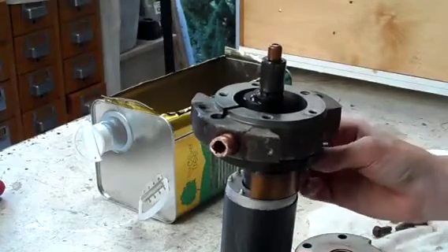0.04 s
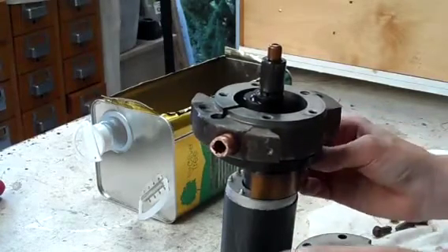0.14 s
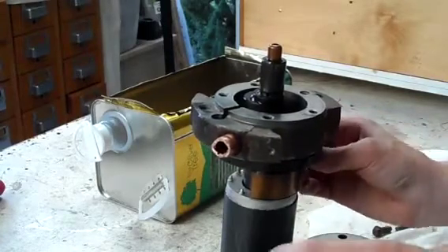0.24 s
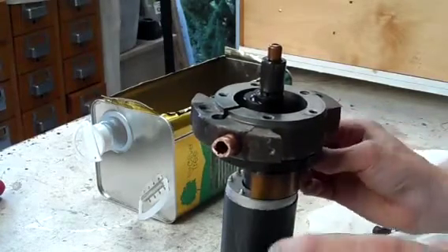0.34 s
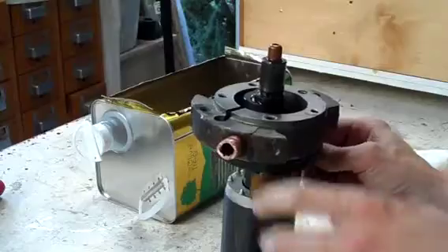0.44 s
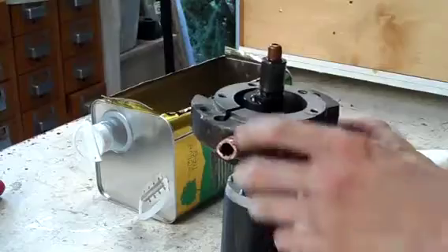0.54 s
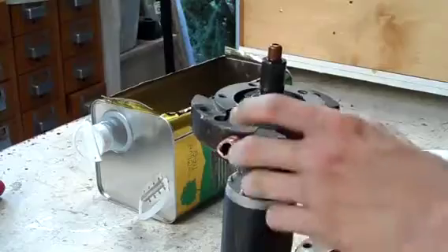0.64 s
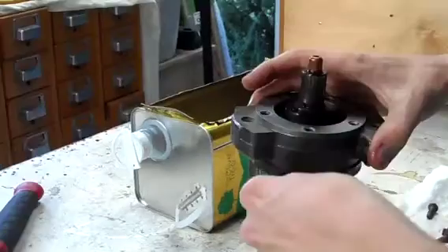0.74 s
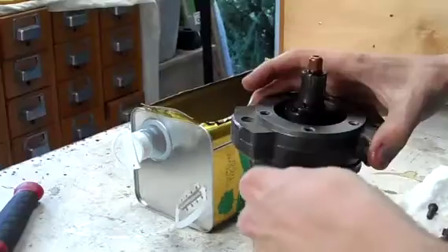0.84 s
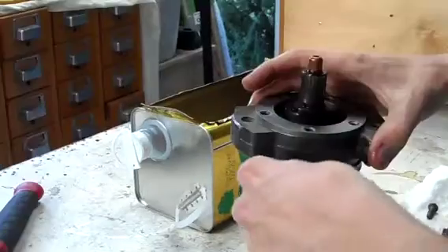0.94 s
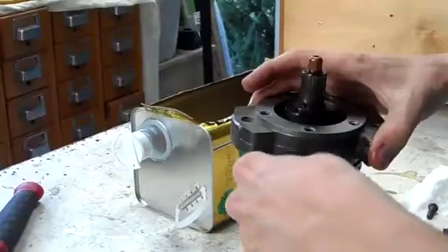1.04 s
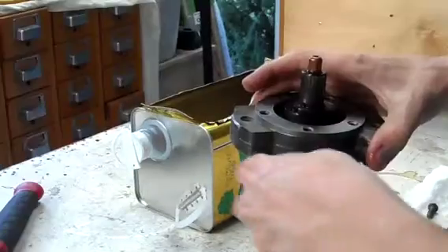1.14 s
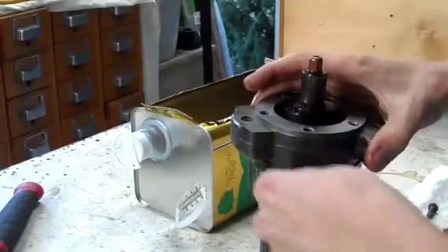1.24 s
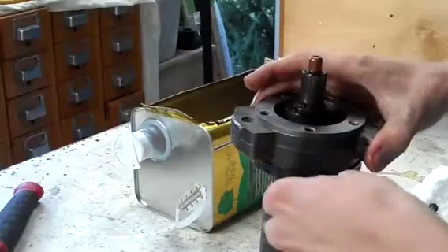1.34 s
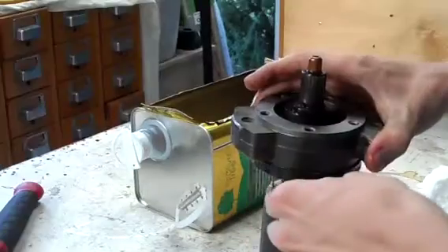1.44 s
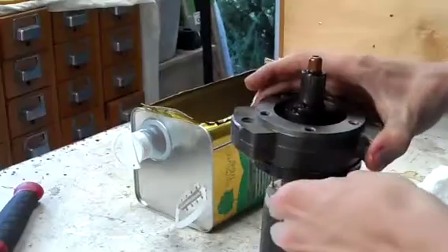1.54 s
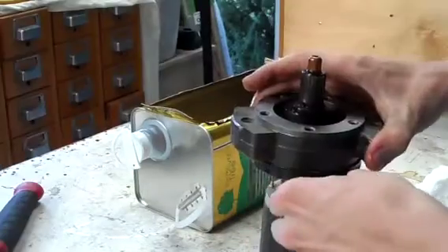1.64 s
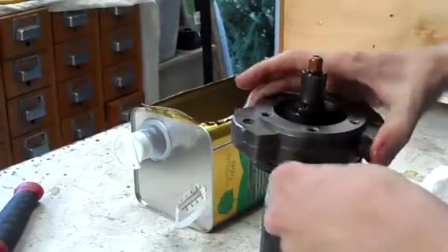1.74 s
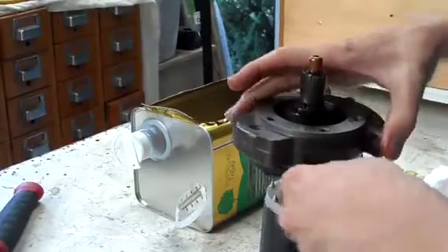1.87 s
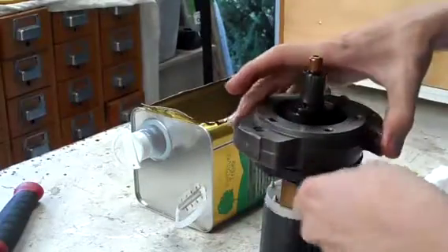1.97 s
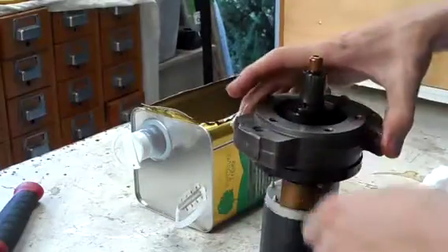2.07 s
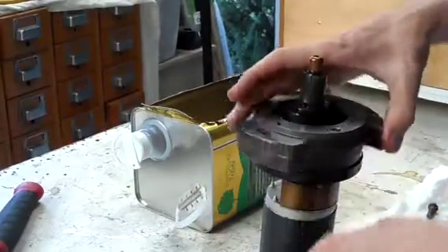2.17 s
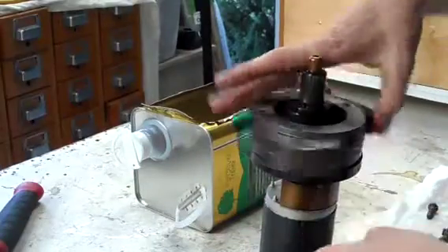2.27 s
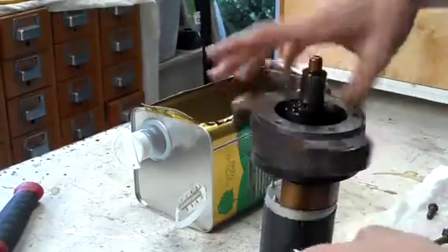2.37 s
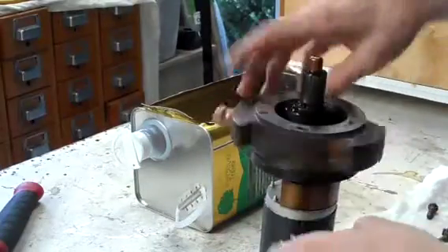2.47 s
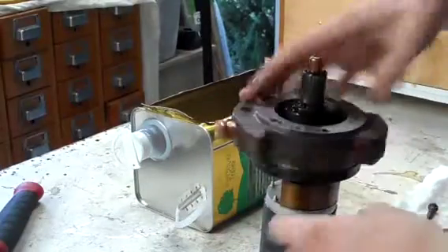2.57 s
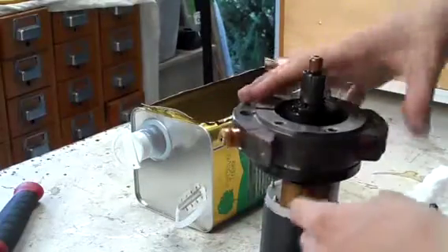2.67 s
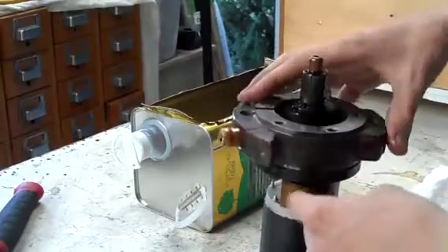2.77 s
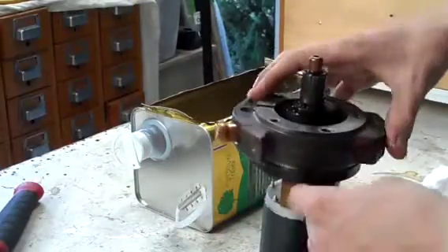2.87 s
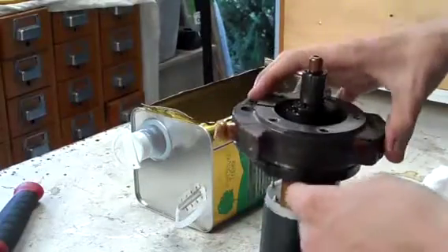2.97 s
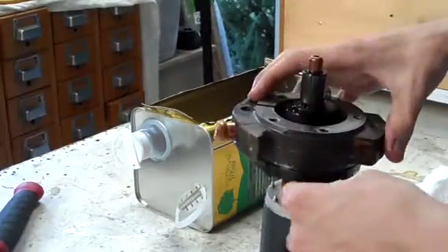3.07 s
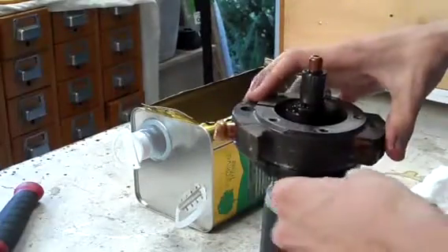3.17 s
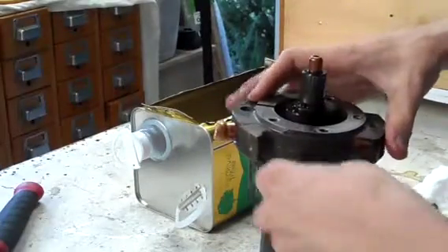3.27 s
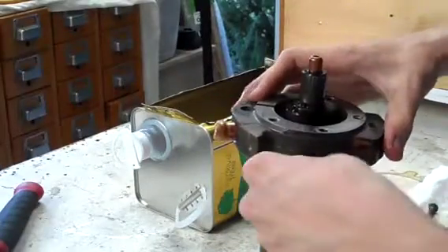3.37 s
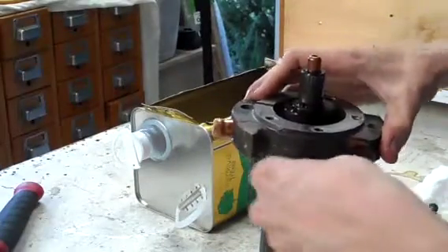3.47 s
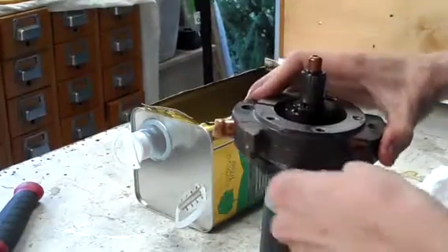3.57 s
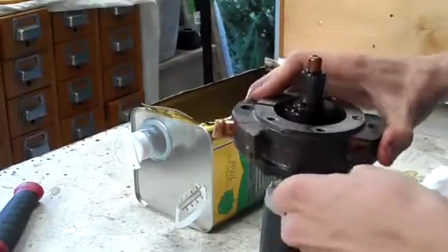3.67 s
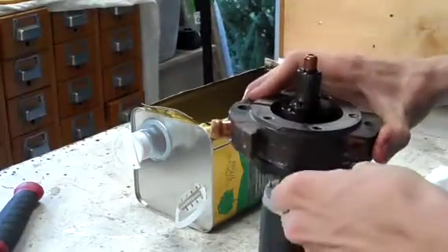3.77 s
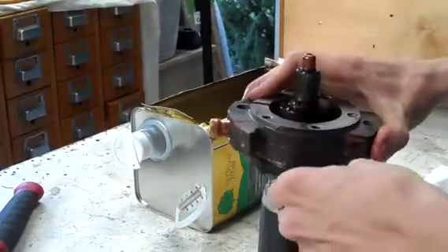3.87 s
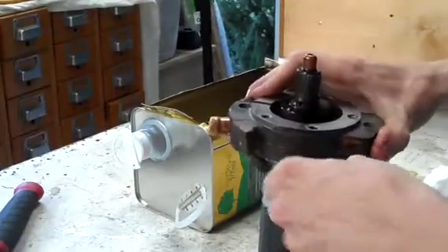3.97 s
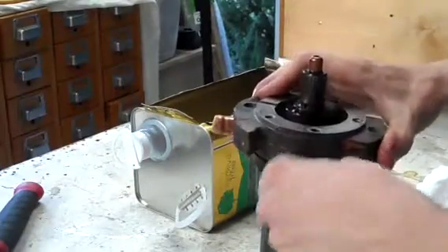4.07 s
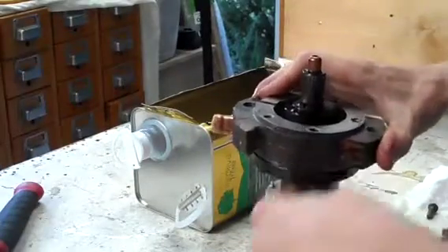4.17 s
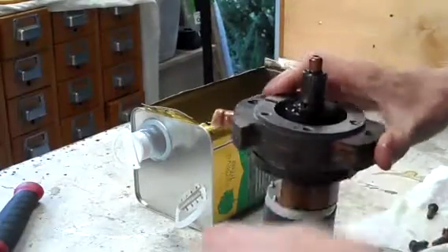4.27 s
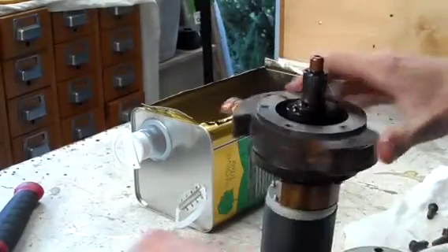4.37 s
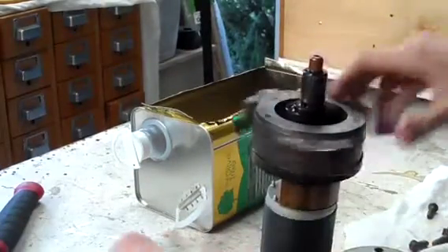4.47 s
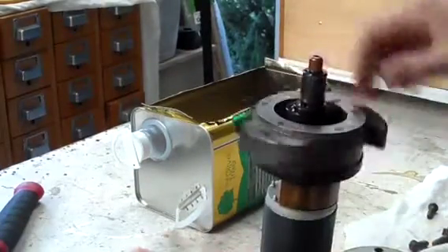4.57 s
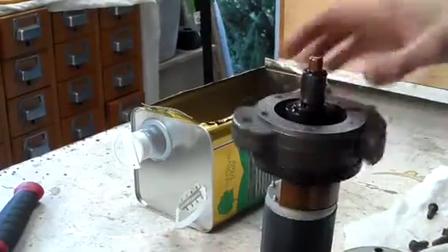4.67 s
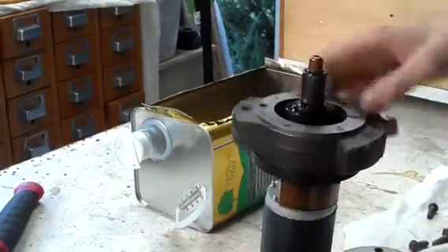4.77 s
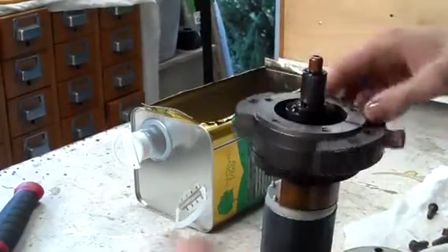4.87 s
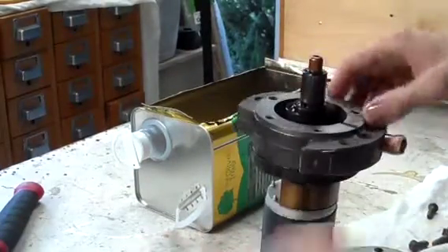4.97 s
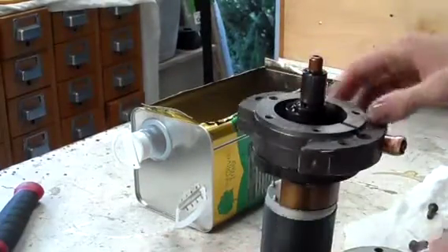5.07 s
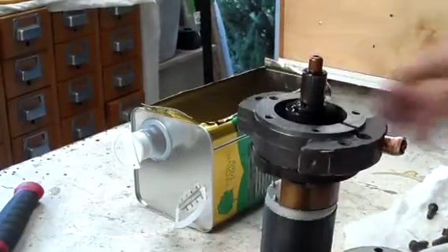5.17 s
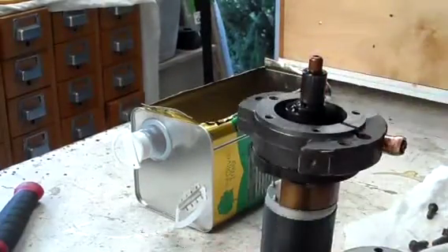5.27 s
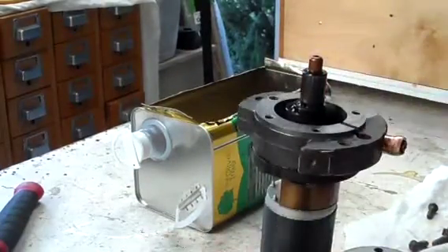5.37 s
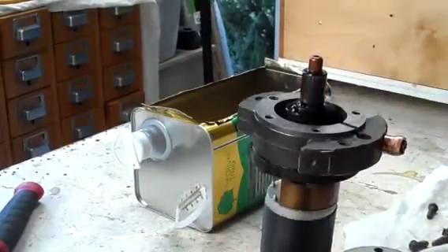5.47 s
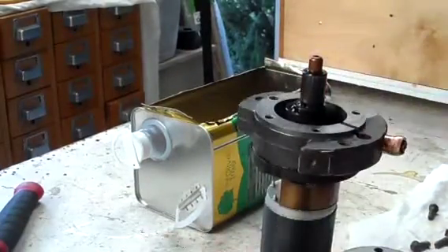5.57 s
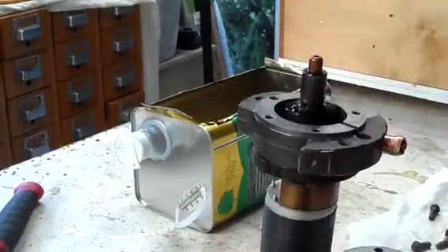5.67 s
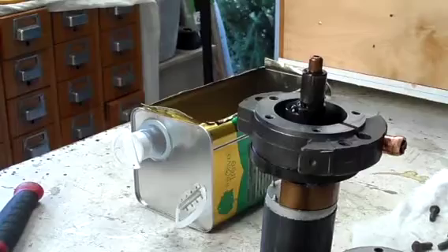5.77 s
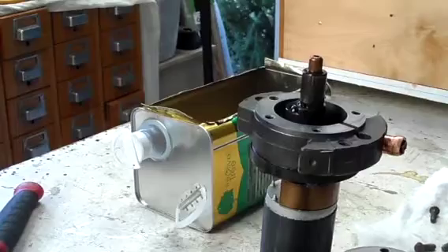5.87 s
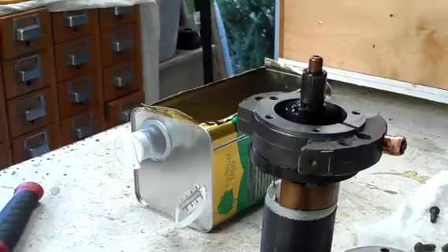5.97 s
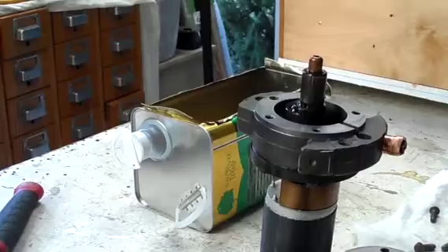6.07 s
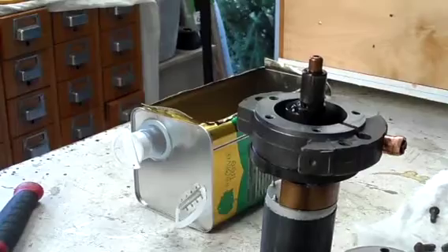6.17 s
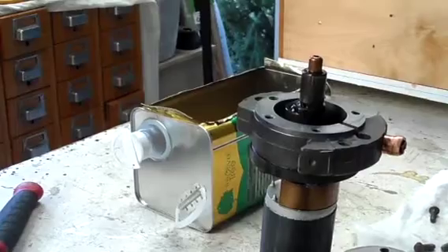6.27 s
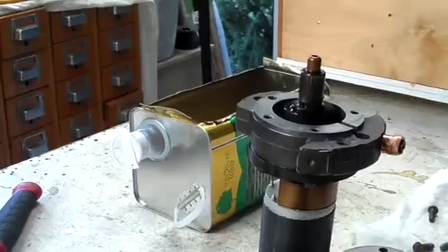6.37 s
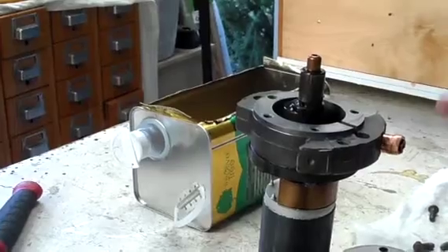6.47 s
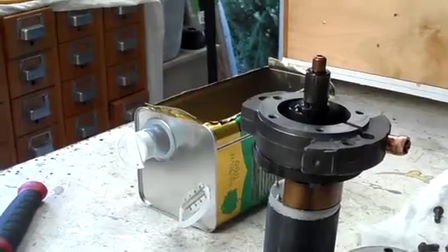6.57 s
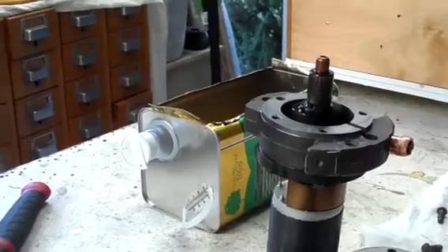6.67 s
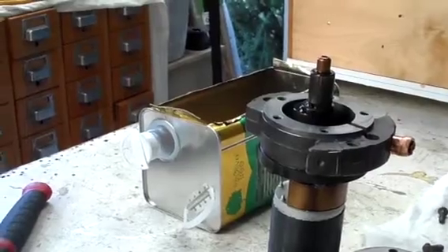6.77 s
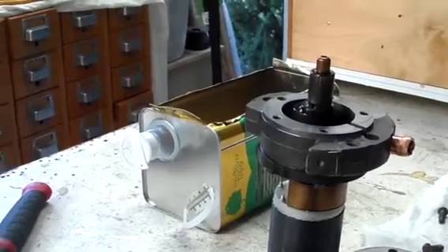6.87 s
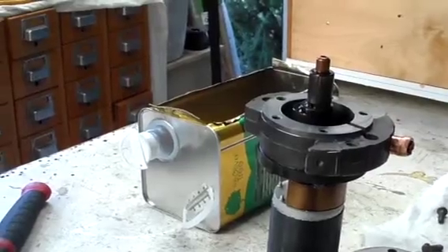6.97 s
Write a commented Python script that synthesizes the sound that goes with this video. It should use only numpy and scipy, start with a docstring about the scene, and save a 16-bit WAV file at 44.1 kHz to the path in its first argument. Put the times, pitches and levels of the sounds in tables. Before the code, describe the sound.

Close microphone in a small quiet workshop with low room rumble, faint wavering hums and a distant bird chirp at first. Hands turn a cast metal housing on its shaft: bright small clinks, soft bench thuds, skin rubs and one sharper fitting tap. Near the end the housing slips and clanks loudly, scrapes, then clanks again with a rapid chatter and thin high squeal. Quiet thuds, brushes and small plastic ticks follow.

```python
"""Low room rumble, wavering drones and a faint bird open a small, quiet workshop, heard up close.
At the bench a cast compressor housing is turned by hand on its shaft: small parts clink, fingers rub,
the bench thuds; then the housing slips, clanks down twice and chatters onto its seat with a squeal.
Blows ring fixed modes over dense coloured noise; sliding is random impacts and wavering tones;
rubs and room are filtered noise; drones and bird are unsteady sines."""
import sys
import numpy as np
from scipy import signal
from scipy.fft import rfft, irfft, next_fast_len
from scipy.io import wavfile
from scipy.ndimage import uniform_filter1d

SR = 44100
rng = np.random.default_rng(int(sys.argv[2]) if len(sys.argv) > 2 else 0)


def output_pcm(signal):
    """Save a mono or channel-first signal as 16-bit PCM at the path in sys.argv[1].

    Samples are clipped to [-1, 1] before scaling.
    """
    pcm = np.clip(np.atleast_2d(signal).T, -1, 1) * 32767
    wavfile.write(sys.argv[1], SR, np.round(pcm).astype(np.int16))


N = 310020
T = np.arange(N) / SR
RING = T[:SR // 2]  # half a second for each blow to die away
# the housing drops onto its seat, then chatters and squeals until it stops
SEAT_S, SEAT_ATTACK_S, SEAT_HOLD_S = 5.103, 0.0074, 0.061


def undb(db):
    """Decibels to gain."""
    return 10 ** (np.asarray(db) / 20)


def unit(x):
    """Scale to unit energy."""
    return x / np.sqrt(np.sum(x ** 2))


def rms_one(x):
    """Scale to unit power."""
    return x / np.std(x)


def cut(x, hz, kind, order=2):
    """Causal low- or high-pass."""
    return signal.sosfilt(signal.butter(order, hz, kind, fs=SR, output="sos"), x)


def colour(x, points):
    """Causal filter with the given (f/Hz, level/dB) spectrum, built from its cepstrum."""
    size = 2 * next_fast_len(len(x))
    hz, db = np.transpose(points)
    bins = np.maximum(np.fft.rfftfreq(size, 1 / SR), 1)
    gain = undb(np.interp(np.log(bins), np.log(hz), db))
    cepstrum = irfft(np.log(gain))
    # folding the cepstrum forward gives minimum phase
    cepstrum[1:size // 2] *= 2
    cepstrum[size // 2 + 1:] = 0
    return irfft(rfft(x, size) * np.exp(rfft(cepstrum)))[:len(x)]


def band(x, hz, width_hz):
    """A steep zero-phase band-pass: one resonance's gain applied twice."""
    size = 2 * next_fast_len(len(x))
    bins = np.maximum(np.fft.rfftfreq(size, 1 / SR), 1)
    detuning = (bins ** 2 - hz ** 2) / (bins * width_hz)
    return irfft(rfft(x, size) / (1 + detuning ** 2), size)[:len(x)]


def walk(rate):
    """Smooth random wander with a spread of one, taking rate new values per second."""
    hold = int(SR / rate)
    steps = np.repeat(rng.standard_normal(N // hold + 1), hold)
    return rms_one(uniform_filter1d(steps, hold)[:N])


def add(track, start_s, sound):
    """Mix a sound into a track."""
    start = int(start_s * SR)
    track[start:start + len(sound)] += sound[:N - start]


def decay(t60):
    """Free decay of a ring."""
    return np.exp(-np.log(1000) * RING / t60)


def envelope(start_s, attack_s, hold_s, t60_s, sag_db_per_s=0):
    """A straight attack, a hold that may sag, and a free decay."""
    held = T - start_s - attack_s
    sag_db = -sag_db_per_s * np.clip(held, 0, hold_s)
    fade_db = -60 * np.maximum(held - hold_s, 0) / t60_s
    attack = np.clip((T - start_s) / attack_s, 0, 1)
    return attack * undb(np.maximum(sag_db + fade_db, -200))


def new_texture():
    """Random fine structure for an object's dense modes and for the room's tail."""
    return rng.standard_normal((2, len(RING)))


def response(modes, wash, texture, ring_db, crack_db, early_t60, room_db, room_t60, scatter_db):
    """One blow on an object: a crack, fast dense modes, the workshop's tail and clear rings."""
    # the point of contact decides how strongly each mode answers
    scatter = scatter_db * rng.standard_normal((len(modes), 2))[:, 0]
    rings = np.zeros(len(RING))
    for k, (hz, db, t60) in enumerate(modes):
        sign = (-1) ** k  # neighbours swing opposite ways
        rings += sign * undb(db + scatter[k]) * decay(t60) * np.sin(2 * np.pi * hz * RING)
    early, room = texture
    # the walls answer a few milliseconds late
    tail = unit(room * (decay(room_t60) - decay(0.021)))
    dense = unit(early * decay(early_t60)) + undb(room_db) * tail
    dense[0] += undb(crack_db)
    return unit(colour(dense, wash)) + undb(ring_db) * unit(rings)


def blows(table, body):
    """Each contact pushes for a short time, which limits its treble, and its hard edge adds a tick."""
    out, own = np.zeros(N), new_texture()
    for s, db, contact_hz, low_hz, tick_db in table:
        # half of the fine structure belongs to the object, half to the spot that is struck
        ring = cut(body(own + new_texture()), low_hz, "high")
        push = cut(ring, contact_hz, "low", order=3)
        tick = undb(tick_db) * cut(ring, contact_hz, "high", order=3)
        add(out, s, undb(db) * unit(push + tick) * np.sqrt(SR / 50))  # level is the rms over 20 ms
    return out


def hardness(contact_hz):
    """Hardness of a contact in octaves above 1 kHz."""
    return np.log2(contact_hz / 1000)


def impacts(force, rate, spread_db):
    """A stream of tiny random impacts, rate per second, whose strength follows a force envelope."""
    happens = rng.random(N) < rate / SR
    strength = undb(spread_db * rng.standard_normal(N))
    pushes = happens * strength * rng.choice([-1, 1], N)
    return rms_one(pushes) * force


def air(restless_db=1.7):
    """Room rumble that stirs a little, under a smooth hiss: coloured noise."""
    # spectrum of the room at rest: f/Hz, level/dB per Hz
    air_spectrum = [(12, -31), (20, 1.5), (37, 2.5), (101, -7), (134, -6.5), (172, -9.5), (241, -10),
                    (277, -16), (310, -10.5), (337, -12.5), (624, -19.5), (718, -19), (3250, -28.5),
                    (13500, -34), (16000, -30.5)]
    # background level through the scene: t/s, level/dB
    air_level = [(0, -55), (4.8, -55.5), (5.35, -58), (7.03, -58)]
    noise = rms_one(colour(rng.standard_normal(N), air_spectrum))
    rumble = cut(noise, 450, "low", order=1)
    stirred = noise + rumble * (undb(restless_db * walk(12)) - 1)
    return stirred * undb(np.interp(T, *np.transpose(air_level)))


def drones(waver=0.042, flutter_db=1.6, edge_s=.06):
    """Faint low hums that come and go, their pitch (as a share) and level wandering."""
    # hums behind the bench: start t/s, end t/s, f/Hz, level/dB
    hums = [(-.1, 0.818, 53.5, -54), (0.947, 1.74, 245, -63), (2.21, 2.95, 62.1, -57)]
    out = np.zeros(N)
    for start, end, hz, db in hums:
        gate = np.clip(np.minimum(T - start, end - T) / edge_s, 0, 1)
        phase = 2 * np.pi * np.cumsum(hz * (1 + waver * walk(34.5))) / SR
        out += np.sqrt(2) * np.sin(phase) * gate * undb(db + flutter_db * walk(21.98))
    return out


def bird(blur=0.021, flutter_db=2.5, attack_s=0.04):
    """Thin gliding whistles from outside that swell quickly and fade, blurred on their way in."""
    # distant whistles: start t/s, length/s, starting f/Hz, glide/(Hz per s), level/dB
    calls = [(.11, .15, 3100, -1000, -74), (.25, .13, 7450, 4000, -67), (.935, .32, 3160, -1400, -66)]
    out = np.zeros(N)
    for start, length, hz, glide, db in calls:
        pitch = hz + glide * np.clip(T - start, 0, length)
        phase = 2 * np.pi * np.cumsum(pitch * (1 + blur * walk(400))) / SR
        swell = np.interp(T - start, [0, attack_s, length], [0, 1, 0])
        out += np.sqrt(2) * np.sin(phase) * swell * undb(db + flutter_db * walk(59.5))
    return out


def rubs(grain_db=2.0):
    """Skin slides in short, grainy strokes of band-passed noise: firm rubs and airy brushes."""
    # fingers on metal and on the camera case: centre t/s, length/s, level/dB, centre f/Hz
    firm_strokes = [(.048, .03, -66, 2700), (0.466, .052, -65, 2840), (.686, .18, -63.5, 2400),
                    (0.696, .19, -60, 460), (3.101, .12, -65.5, 2600), (3.377, 0.046, -55, 4400),
                    (4.52, 0.09, -65, 6500), (4.621, .27, -60, 278), (6.115, .14, -64.5, 1910),
                    (6.684, .14, -59.5, 7250), (6.689, .1, -62.5, 700), (6.684, .14, -50, 90),
                    (6.852, 0.062, -62.5, 7600), (6.897, 0.099, -43.5, 50)]
    # light brushes of skin or cloth: centre t/s, length/s, level/dB
    airy_strokes = [(2.839, .061, -64), (4.63, .26, -68.5), (5.743, .13, -66), (5.855, .14, -64.5),
                    (6.137, 0.23, -63.5), (6.34, .1, -66.5), (6.474, .11, -64), (6.663, 0.23, -59)]
    width_share = 1.42  # firm bandwidth as a share of the centre frequency
    brush_hz, brush_width_hz = 12800, 9800
    firm = [(s, length, db, hz, width_share * hz) for s, length, db, hz in firm_strokes]
    airy = [(s, length, db, brush_hz, brush_width_hz) for s, length, db in airy_strokes]
    out, grain = np.zeros(N), undb(grain_db * walk(160))
    for s, length, db, hz, width_hz in firm + airy:
        size = int(length * SR)
        stroke = rms_one(band(rng.standard_normal(len(RING)), hz, width_hz))[:size]
        swell = np.sin(np.linspace(0, np.pi, size))
        add(out, s - length / 2, undb(db) * stroke * swell)
    return out * grain


def case(texture):
    """A plastic shell that dies away at once: decaying coloured noise without clear modes."""
    # dense modes of the shell: f/Hz, level/dB per Hz
    case_wash = [(200, -8), (450, 7), (900, -1.5), (1400, -7), (2300, -3.5), (6000, -6), (14000, -5)]
    return colour(texture[0] * decay(0.086), case_wash)


def case_ticks(low_cut_hz=450, tick_db=-20):
    """Fingernails catch on the camera case, each a short tick of the shell."""
    # nail contacts: t/s, level/dB, contact cut-off f/Hz
    nails = [(6.164, -56.5, 3830), (6.245, -58.5, 1500), (6.605, -63.5, 6000), (6.708, -57, 5000),
             (6.728, -66, 14000)]
    return blows([(s, db, hz, low_cut_hz, tick_db) for s, db, hz in nails], case)


def bench(texture):
    """The bench top under the compressor, with low, short modes."""
    # clear modes of the bench: f/Hz, level/dB, t60/s
    bench_modes = [(78, 2.5, .15), (115.6, 9.5, 0.062), (144, 5.5, .13), (233, -8, 0.083), (312, 1.5, 0.23),
                   (367, -0.5, 0.13), (485, -9.5, 0.037), (571, -2.5, .12)]
    # its dense modes: f/Hz, level/dB per Hz
    bench_wash = [(40, 2), (130, -5), (400, -1), (700, -4.5), (1200, -22), (3000, -28), (9000, -37.5)]
    return response(bench_modes, bench_wash, texture, ring_db=2, crack_db=0, early_t60=0.049,
                    room_db=-5.5, room_t60=.27, scatter_db=2.5)


def thuds(low_cut_hz=76, tick_db=-20):
    """The hands bump the compressor and the bench answers: soft contacts pass little treble."""
    # soft bumps carried into the bench: t/s, level/dB, contact cut-off f/Hz
    bumps = [(.662, -48.5, 480), (.727, -46.5, 520), (1.541, -51, 400), (1.983, -49, 407),
             (2.522, -48.5, 430), (2.566, -46, 392), (2.66, -51.5, 350), (2.968, -51, 350),
             (3.540, -48, 700), (3.890, -47.5, 400), (4.3752, -41.5, 460), (4.4285, -41.5, 400),
             (4.498, -47, 520), (4.733, -50.5, 400), (5.6636, -42, 850), (5.684, -49.5, 800),
             (5.748, -52.5, 250), (5.773, -54.5, 410)]
    return blows([(s, db, hz, low_cut_hz, tick_db) for s, db, hz in bumps], bench)


def small_steel(texture):
    """A small steel part with high modes, damped by the fingers."""
    # clear modes of the part: f/Hz, level/dB, t60/s
    clink_modes = [(2720, -8, .07), (3000, -10, 0.1), (4600, -15, 0.068), (5700, -10, 0.11),
                   (6550, -3, 0.069), (8740, -10, 0.081), (9700, -19, .07), (9850, 10.5, 0.053),
                   (9850, -13, 0.25), (12280, 2, 0.049), (12490, -7, .12), (13500, 1.5, .1),
                   (14700, -2, .08), (14780, -9, .08)]
    # its dense modes: f/Hz, level/dB per Hz
    clink_wash = [(1500, -20), (2200, -8), (2750, 2.5), (3800, -14), (5000, -10), (6600, -6), (7800, -9.5),
                  (9800, 2), (11200, -7.5), (12400, -5), (13300, -1), (14300, 7), (16000, -31)]
    return response(clink_modes, clink_wash, texture, ring_db=-1, crack_db=-27, early_t60=0.02,
                    room_db=-2.5, room_t60=0.094, scatter_db=2.5)


def clinks():
    """Small parts touch: the harder the contact, the more tick."""
    # touches of steel: t/s, level/dB, contact cut-off f/Hz, low cut f/Hz
    touches = [(.8135, -63, 7000, 2000), (.8458, -39.5, 14000, 1990), (.8478, -41, 13800, 2000),
               (1.0072, -47, 11000, 1500), (1.0365, -54.5, 7040, 1500), (3.1535, -41.5, 11100, 4400),
               (3.3705, -53.5, 4020, 1500), (3.380, -52.5, 4000, 1500), (3.5395, -56, 3300, 1500),
               (4.363, -57.5, 4000, 1800)]
    tick_db, tick_db_per_octave = -45.5, 11.5  # tick of a 1 kHz contact, and its rise with hardness
    contacts = []
    for s, db, hz, low_hz in touches:
        contacts.append((s, db, hz, low_hz, tick_db + tick_db_per_octave * hardness(hz)))
    return blows(contacts, small_steel)


def fitting(texture):
    """The short pipe fitting on the housing's side, ringing in clear modes."""
    # clear modes of the fitting: f/Hz, level/dB, t60/s
    fitting_modes = [(738, -1, 0.13), (865, -4.5, 0.17), (1068, -8, 0.15), (2040, -32, .18),
                     (2324, -6.5, 0.17), (3525, -5, 0.13), (5889, -16, .14), (6530, -17, .14),
                     (6600, -13, 0.14), (9760, -12, 0.12), (11540, -13, .11), (12600, -13, 0.11),
                     (14800, -9, .08)]
    # its dense modes: f/Hz, level/dB per Hz
    fitting_wash = [(400, -8.5), (780, 3.5), (1500, -11), (3300, 3), (4500, -8.5), (6700, -7), (8300, -26),
                    (12000, -11.5), (15000, -12)]
    return response(fitting_modes, fitting_wash, texture, ring_db=-6, crack_db=-12, early_t60=0.031,
                    room_db=-6.0, room_t60=0.15, scatter_db=0.5)


def fitting_tap():
    """The side fitting is tapped as the housing swings round: a hard contact with a full tick."""
    # the tap: t/s, level/dB, contact cut-off f/Hz, low cut f/Hz, sharp tick level/dB
    taps = [(2.2518, -35, 12000, 280, 0)]
    return blows(taps, fitting)


def housing(texture):
    """The heavy casting on its shaft: its modes ring clearly over a dense wash."""
    # clear modes of the casting: f/Hz, level/dB, t60/s
    housing_modes = [(147, -10, 0.18), (302.4, 2, 0.17), (364, 3.5, .1), (412, -9, 0.15), (503, -2.5, 0.11),
                     (569, -9.5, 0.27), (662, 2, 0.083), (704, 0.5, 0.089), (830, -7.5, 0.047),
                     (889, -9.5, 0.16), (951, -5.5, 0.11), (1004, -18, 0.28), (1049, -15.5, .16),
                     (1165, -20, 0.2), (1417, -4, 0.087), (1580, -22, 0.15), (1690, -9.5, 0.17),
                     (1846, -10.5, 0.18), (1978, -10, 0.054), (2390, -14, .13), (2760, -14.5, 0.086),
                     (2747, -6.5, 0.11), (3170, -28, .15), (3230, -4, 0.11), (3750, -21, 0.074),
                     (4140, -10, 0.092), (4150, -17.5, 0.13), (6490, -2, .1), (7773, -18, 0.14)]
    # its dense, unresolved modes: f/Hz, level/dB per Hz
    housing_wash = [(90, -29.5), (200, -13), (300, -3.5), (420, -1), (750, 2), (1200, -4), (2000, -3.5),
                    (3000, -4.5), (5000, -7.5), (7500, -11.5), (11000, -13.5), (14500, -18), (16000, -26)]
    return response(housing_modes, housing_wash, texture, ring_db=-4.5, crack_db=-1, early_t60=0.063,
                    room_db=-5, room_t60=0.19, scatter_db=2.0)


def scrape(contact_hz=2800, zing_hz=7300, zing_width_hz=1500, zing_db=-3):
    """The tilted bore catches and slips along the shaft: duller impacts with a thin zing."""
    ring = cut(housing(new_texture()), 300, "high")
    ring = cut(ring, contact_hz, "low", order=3) + undb(zing_db) * band(ring, zing_hz, zing_width_hz)
    # the housing gathers force down its shaft and lets go
    force = undb(-44) * envelope(start_s=4.932, attack_s=.05, hold_s=.02, t60_s=.11)
    return signal.fftconvolve(impacts(force, rate=710, spread_db=1.5), unit(ring))[:N]


def chatter(level_db=-26, sag_db_per_s=12, t60_s=0.09, low_hz=350):
    """Rapid hard impacts as the housing settles onto its seat."""
    force = undb(level_db) * envelope(SEAT_S, SEAT_ATTACK_S, SEAT_HOLD_S, t60_s, sag_db_per_s)
    ring = cut(housing(new_texture()), low_hz, "high", order=3)
    return signal.fftconvolve(impacts(force, rate=700, spread_db=0), unit(ring))[:N]


def squeal(waver_hz=14, flutter_db=1.8):
    """Friction keeps three high modes singing while the housing slides; then they ring out."""
    # shaft modes set singing by steel on steel: f/Hz, level/dB, sag/(dB per s), t60/s
    singing_modes = [(9870, -29, 71, 0.12), (14200, -38, 140.5, .19), (14900, -27, 240, .15)]
    out = np.zeros(N)
    for hz, db, sag_db_per_s, t60 in singing_modes:
        phase = 2 * np.pi * np.cumsum(hz + waver_hz * walk(230)) / SR
        swell = envelope(SEAT_S, SEAT_ATTACK_S, SEAT_HOLD_S, t60, sag_db_per_s)
        out += np.sqrt(2) * np.sin(phase) * swell * undb(db + flutter_db * walk(180))
    return out


def clanks():
    """The housing knocks on its seat: a harder contact moves less mass and ticks more sharply."""
    # strikes on the seat: t/s, level/dB, contact cut-off f/Hz
    strikes = [(4.4875, -53, 1300), (4.4965, -45, 2430), (4.5045, -44.5, 2530), (4.528, -52.5, 2100),
               (4.8540, -17.5, 1850), (4.9338, -26.5, 1540), (4.9626, -31.5, 1450), (4.9815, -32, 1230),
               (5.044, -43.5, 650), (5.0790, -21, 2400), (5.1034, -18, 3200), (5.1058, -20, 7500),
               (5.1250, -21, 7000), (5.1478, -27, 3580)]
    low_cut_hz, low_cut_rise = 80, 1.6  # low cut of a 1 kHz contact, and its factor per octave of hardness
    tick_db, tick_db_per_octave = -22, 9.5  # tick of a 1 kHz contact, and its rise with hardness
    contacts = []
    for s, db, hz in strikes:
        low_hz = low_cut_hz * low_cut_rise ** hardness(hz)
        contacts.append((s, db, hz, low_hz, tick_db + tick_db_per_octave * hardness(hz)))
    return blows(contacts, housing)


def scene():
    """Everything at the bench, heard from one close microphone."""
    metal = clanks() + clinks() + fitting_tap()
    sliding = scrape() + chatter() + squeal()
    handling = thuds() + case_ticks() + rubs()
    background = drones() + bird() + air()
    return (metal + sliding + handling + background)[None]


def record(dry):
    """The level dips once; the camera rounds the highest peaks and cuts the top."""
    dip_s, dip_db, fall_s, rise_s = .803, -18, .026, .012
    ceiling, top_hz = .66, 15900
    dip = undb(np.interp(T - dip_s, [-fall_s, 0, rise_s], [0, dip_db, 0]))
    rounded = ceiling * np.tanh(dry * dip / ceiling)
    return signal.sosfilt(signal.ellip(10, .2, 70, top_hz, fs=SR, output="sos"), rounded)


dry = scene()
out = record(dry)
output_pcm(out)
```